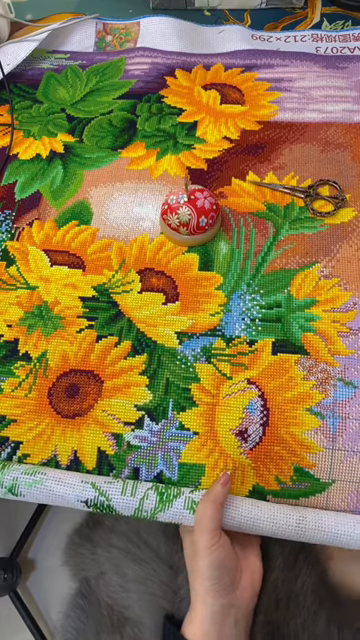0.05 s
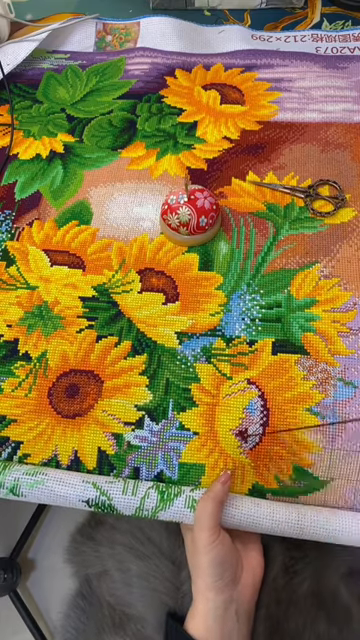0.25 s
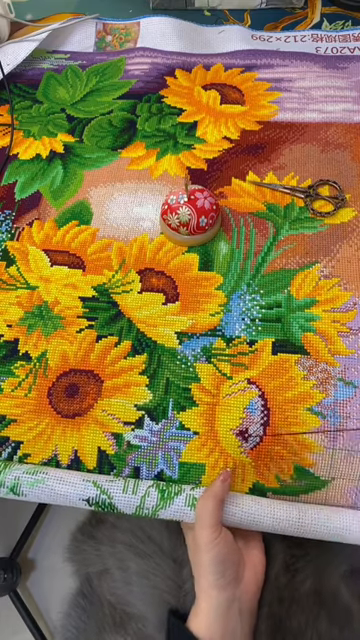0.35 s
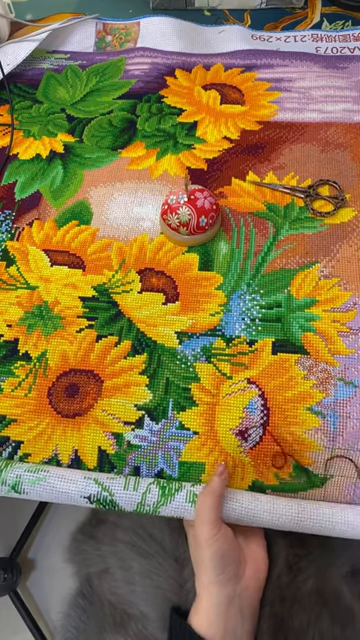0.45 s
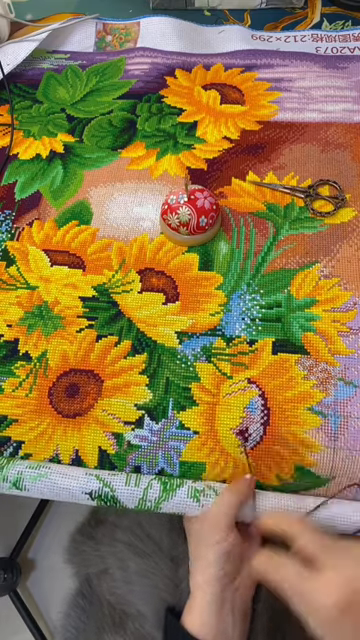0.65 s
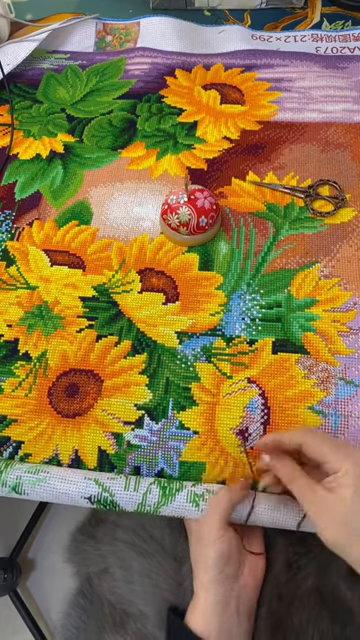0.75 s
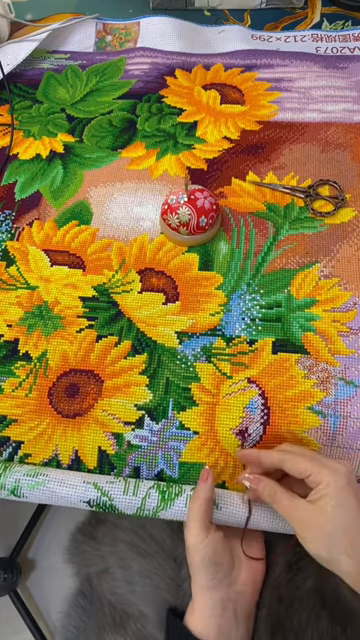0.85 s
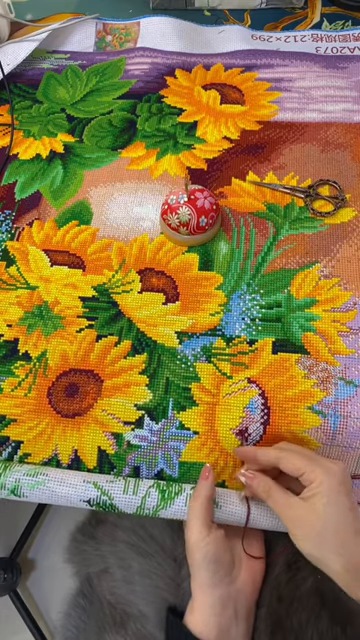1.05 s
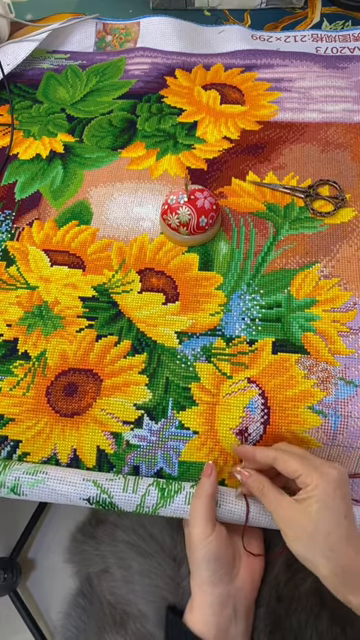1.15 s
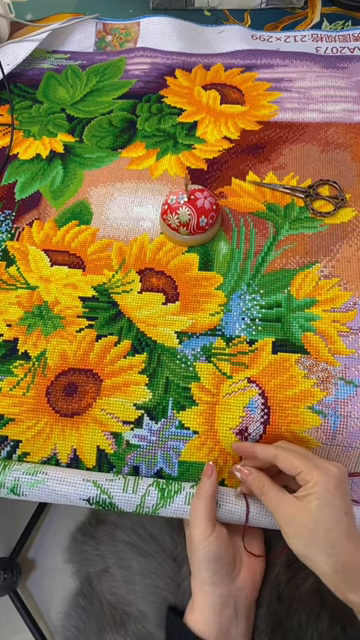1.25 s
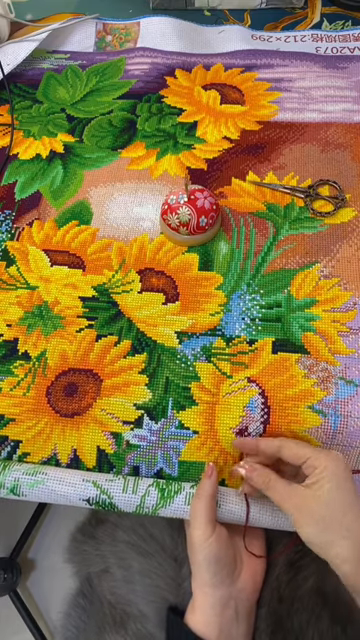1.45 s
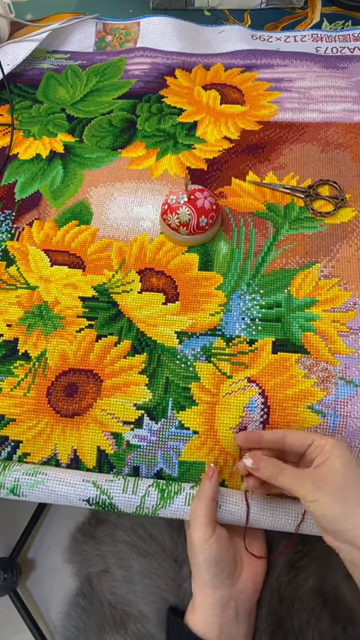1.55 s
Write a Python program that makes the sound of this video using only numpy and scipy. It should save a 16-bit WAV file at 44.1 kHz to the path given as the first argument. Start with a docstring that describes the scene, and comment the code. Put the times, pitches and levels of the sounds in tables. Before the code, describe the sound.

Thread is pulled through stretched fabric with a thump and short rasp, amid faint finger taps

```python
"""In a quiet room with a faint hum, a needle pops through cloth stretched on a frame with a thump,
and the thread rasps after it through the hole. Fingers brush, tap and nudge the cloth before and after.
Thumps are ringing tones of the cloth; ticks and rasp are random clicks, filtered into bands or resonances;
brushing and room air are coloured noise; squeaks are noise through a narrow resonance; the hum is a sine."""
import sys
import numpy as np
from scipy import signal
from scipy.fft import rfft, irfft
from scipy.io import wavfile

SR = 44100
rng = np.random.default_rng(int(sys.argv[2]) if len(sys.argv) > 2 else 0)


def nominal_scale(level):
    """Amplitude ratio for a level in decibels (scalar or array-like)."""
    x = np.asarray(level, float) / 20
    return 10 ** x


def store_wav(level_fs):
    """Save 16-bit WAV to argv[1]."""
    pcm = np.round(np.clip(np.atleast_2d(level_fs), -1, 1) * 32767)
    wavfile.write(sys.argv[1], SR, pcm.T.astype(np.int16))


N = 70560  # samples, 1.6 s

# Colour of the room air. Each row: frequency in Hz, relative level in dB per Hz.
ROOM_COLOUR = [(15, -43), (25, -18.5), (53, -10.5), (86, -10.5), (120, -6), (160, -11), (216, -11),
               (310, -17.5), (527, -15.5), (800, -22), (1400, -27), (2750, -30.5), (6000, -36.5),
               (11800, -42), (15500, -54)]
# Strokes of fingers on the cloth. Each row: start in seconds, rms level in dB before the flutter,
# length in seconds.
BRUSH_STROKES = [(.006, -68, 0.026), (0.034, -71.5, 0.016), (0.077, -68, 0.023), (0.107, -66, 0.02),
                 (0.123, -66.5, 0.024), (0.161, -72, 0.0099), (0.215, -73, 0.017), (0.386, -77.5, 0.15),
                 (0.527, -69.5, 0.021), (.655, -84, 0.11), (0.578, -69.5, 0.068), (0.764, -68, 0.013),
                 (0.784, -74.5, 0.069), (0.842, -73, 0.021), (1.487, -82, 0.01), (1.557, -72.5, 0.024)]
# Colour of skin rustling on the weave. Each row: frequency in Hz, relative level in dB per Hz.
RUSTLE_COLOUR = [(180, -36), (300, -4), (1050, -5), (1520, -9), (2110, -7), (3520, -14.5), (11600, -16),
                 (15600, -17)]
# Ringing tones of the stretched cloth and its frame. Each row: frequency in Hz, relative level in dB,
# time to fade by 60 dB in seconds.
CLOTH_MODES = [(86.4, 2, .5), (201, -23, 0.23), (261, -11, .05), (331, 8, 0.021), (520, 7, 0.013),
               (1005, -2.5, 0.031), (1190, -9, 0.021), (2800, -9.5, 0.015)]
# Blows on the cloth. Each row: start in seconds, strength in dB, contact cut-off in Hz (softer is lower),
# seconds of ringing until a hand or the thread damps it.
CLOTH_BLOWS = [(0.2411, -32, 780, 0.018), (0.2501, -32.5, 129, 0.0055), (0.013, -53.5, 151, 0.037),
               (0.112, -54, 147, 0.027), (0.211, -58, 890, 0.033), (0.367, -46.5, 98, 0.0097),
               (0.398, -48, 120, 0.019), (.531, -55, 596, 0.014), (0.546, -52, 200, 0.0093),
               (0.564, -52.5, 513, 0.0133), (0.8127, -59.5, 1500, 0.016)]
# Ticks, each a short cluster of scratches. Each row: start in seconds, rms level in dB, length in seconds,
# low edge of the band in Hz, high edge in Hz.
SCRATCH_TICKS = [(.018, -62, 0.013, 370, 810), (0.207, -64, 0.0043, 400, 1200),
                 (.2385, -44, .0025, 600, 3500), (.2385, -56, .002, 3500, 15000),
                 (0.532, -63, 0.0039, 1700, 2380), (.5612, -54, .004, 1500, 2900),
                 (.5608, -58.5, .004, 8500, 15900), (0.5613, -58.5, 0.004, 520, 1450),
                 (.5612, -65.5, 0.0042, 2880, 8400), (0.812, -57, 0.0106, 405, 1340),
                 (.810, -64, 0.0095, 1500, 2800), (0.949, -74.5, .006, 1000, 3000),
                 (1.488, -72, 0.0065, 1000, 3000)]
# Brief squeaks of thread or skin. Each row: start in seconds, rms level in dB, length in seconds,
# pitch in Hz, width in Hz of each of two equal resonances.
SQUEAK_EVENTS = [(.129, -58, 0.0051, 2510, 160), (.596, -65.5, .012, 2190, 130),
                 (0.609, -73.5, .04, 2240, 300)]
# Pull of the thread. Each row: time in seconds, level of the body in dB, level of the hiss in dB
# (both before the flutter), speed as a share of full speed.
THREAD_PULL = [(0.236, -79, -73, .75), (0.24, -56, -58.5, .75), (0.259, -45.5, -64.5, .75),
               (.270, -52, -59, 0.86), (.295, -47, -58, .97), (.325, -50.5, -58.5, 1.054),
               (0.349, -49, -58.5, 1.01), (0.36, -50, -65, 0.87), (0.368, -59, -75, 1.03),
               (.385, -69, -97, 1.05)]
# Cloth resonances in the rasp, at full speed. Each row: frequency in Hz, width in Hz, relative level in dB.
BODY_RESONANCES = [(88, 17, -7), (200, 40, -8), (533, 120, 2), (756, 50, -2.5), (955, 89, -4),
                   (1270, 99, -1.5), (1618, 86, -8.5), (2186, 370, -8.5)]
# Fibre resonances in the rasp. Each row: frequency in Hz, width in Hz, relative level in dB.
HISS_RESONANCES = [(2920, 570, -6), (4670, 700, -4.5), (7790, 490, 0), (9100, 2600, -5), (11480, 650, -4.5),
                   (14400, 1600, -9)]


def clock():
    """Seconds of every sample."""
    return np.arange(N) / SR


def rms_one(x):
    """Scale to rms 1."""
    return x / np.sqrt(np.mean(x ** 2) + 1e-20)


def band(x, order, hz, kind="low"):
    """Butterworth filter: keeps only part of the frequency range."""
    return signal.sosfilt(signal.butter(order, hz, kind, fs=SR, output="sos"), x)


def hold(start_s, length_s, edge_s):
    """Rise, hold, fall; the fall begins length_s after the start."""
    t = clock() - start_s
    return np.clip(np.minimum(t, length_s + edge_s - t) / edge_s, 0, 1)


def burst(x, start_s, length_s, edge_s, db):
    """A piece of x at the given rms level."""
    gate = hold(start_s, length_s, edge_s)
    piece = gate * x
    return nominal_scale(db) * piece / np.sqrt(np.sum(piece ** 2) / np.sum(gate ** 2) + 1e-20)


def drift(rate_hz):
    """Smoothed noise for wavering levels, spread 1."""
    r = np.exp(-2 * np.pi * rate_hz / SR)
    wander = signal.lfilter([1], [1, -2 * r, r * r], rng.standard_normal(N + SR))
    return rms_one(wander[SR:])  # the first second lets the filter settle


def coloured(points):
    """Noise with the given spectrum, rms 1."""
    hz, db = np.transpose(points)
    bins_hz = np.maximum(np.arange(N // 2 + 1) * SR / N, 1)
    gain = nominal_scale(np.interp(np.log(bins_hz), np.log(hz), db))
    return rms_one(irfft(rfft(rng.standard_normal(N)) * gain, N))


def grains(per_s, spread_db):
    """Random clicks of uneven size and either sign, rms 1."""
    born = rng.random(N) < per_s / SR
    size = np.minimum(rng.exponential(1, N), 4)
    return rms_one(born * nominal_scale(spread_db * size) * rng.choice([-1, 1], N))


def resonance(x, hz, width_hz):
    """Two-pole resonance, gain 1 on top."""
    r = np.exp(-np.pi * width_hz / SR)
    feedback = [1, -2 * r * np.cos(2 * np.pi * hz / SR), r * r]
    return signal.lfilter([(1 - r * r) / 2, 0, (r * r - 1) / 2], feedback, x)


def room():
    """Room air is steady coloured noise; the hum is one sine whose level wavers."""
    air_db, hum_db, hum_hz = -65, -70, 120.15
    waver_db, waver_hz = 2.0, 8
    sine = np.sin(2 * np.pi * (hum_hz * clock() + rng.random()))
    hum = np.sqrt(2) * sine * nominal_scale(hum_db + waver_db * drift(waver_hz))
    return nominal_scale(air_db) * coloured(ROOM_COLOUR) + hum


def brushing():
    """Skin sliding on the weave makes a soft wide rustle whose level flutters."""
    edge_s, flutter_db, flutter_hz = .004, 1.5, 69
    strokes = sum(nominal_scale(db) * hold(start_s, length_s, edge_s) for start_s, db, length_s in BRUSH_STROKES)
    return strokes * nominal_scale(flutter_db * drift(flutter_hz)) * coloured(RUSTLE_COLOUR)


def blows():
    """Every blow sets the cloth modes ringing through a softer or harder contact until they are damped."""
    damp_s = .002
    out = np.zeros(N)
    for start_s, db, cut_hz, ring_s in CLOTH_BLOWS:
        t = np.maximum(clock() - start_s, 0)
        ring = np.zeros(N)
        for hz, mode_db, t60 in CLOTH_MODES:
            ring += nominal_scale(mode_db - 60 * t / t60) * np.sin(2 * np.pi * hz * t)
        damping = np.clip((ring_s - t) / damp_s + 1, 0, 1)
        # the tiny constant keeps the filter's numbers from getting too small
        out += nominal_scale(db) * band(ring * damping + 1e-18, 2, cut_hz)
    return out


def ticks():
    """Many tiny scratches close together, limited to a band, are heard as one tick."""
    scratches_per_s, spread_db, edge_s = 7000, -1.0, .0008
    scratches = grains(scratches_per_s, spread_db)
    out = np.zeros(N)
    for start_s, db, length_s, low_hz, high_hz in SCRATCH_TICKS:
        out += burst(band(scratches, 3, [low_hz, high_hz], "band"), start_s, length_s, edge_s, db)
    return out


def squeaks():
    """Noise twice through a narrow resonance gives a brief, rough pitch."""
    edge_s = .003
    noise = rng.standard_normal(N)
    out = np.zeros(N)
    for start_s, db, length_s, hz, width_hz in SQUEAK_EVENTS:
        tone = resonance(resonance(noise, hz, width_hz), hz, width_hz)
        out += burst(tone, start_s, length_s, edge_s, db)
    return out


def rasp(clicks, table):
    """Clicks excite resonances side by side, in alternating sign; rms 1."""
    out = np.zeros(N)
    for k, (hz, width_hz, db) in enumerate(table):
        # a wider resonance lets more through, so the root of the width evens it out
        out += (-1) ** k * nominal_scale(db) / np.sqrt(width_hz) * resonance(clicks, hz, width_hz)
    return rms_one(out)


def thread():
    """Thread catches on the weave, coarse in the cloth, fine in its fibres; speed lifts the cloth's pitch."""
    catches_per_s, catch_spread_db = 4000, 3.0  # catches at full speed
    fibres_per_s, fibre_spread_db = 9000, 2.5
    flutter_db, flutter_hz = 1.2, 57
    times, *columns = np.transpose(THREAD_PULL)
    body_db, hiss_db, speed = (np.interp(clock(), times, column) for column in columns)
    full_speed_body = rasp(grains(catches_per_s, catch_spread_db), BODY_RESONANCES)
    hiss = rasp(grains(fibres_per_s, fibre_spread_db), HISS_RESONANCES)
    # reading the body slower or faster moves its pitch and its catches together
    body = np.interp(np.cumsum(speed), np.arange(N), full_speed_body)
    pulling = (clock() > times[0]) & (clock() < times[-1])
    both = nominal_scale(body_db) * body + nominal_scale(hiss_db) * hiss
    return pulling * nominal_scale(flutter_db * drift(flutter_hz)) * both


def scene():
    """All sources, one channel."""
    return (room() + brushing() + blows() + ticks() + squeaks() + thread())[None]


def band_limit(x):
    """A steep low-pass at the top of the band."""
    return signal.sosfilt(signal.butter(12, 16150, fs=SR, output="sos"), x)


def record(dry):
    """The microphone drops the deepest bass and the top."""
    bass_cut_hz, top_hz = 31, 15900
    no_rumble = band(dry, 2, bass_cut_hz, "high")
    finished = signal.sosfilt(signal.cheby2(10, 40, top_hz, fs=SR, output="sos"), no_rumble)
    return band_limit(finished)


dry = scene()
out = record(dry)
store_wav(out)
```